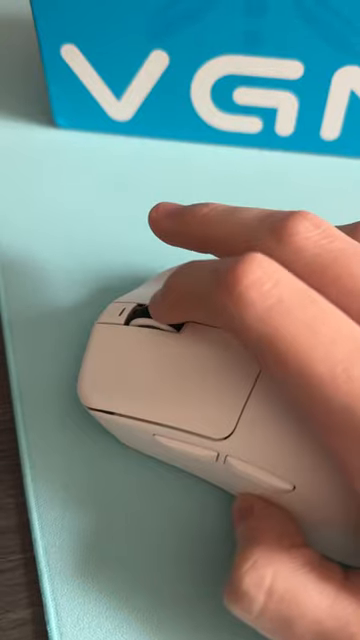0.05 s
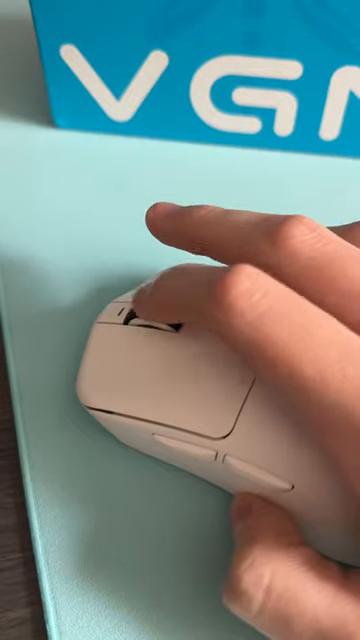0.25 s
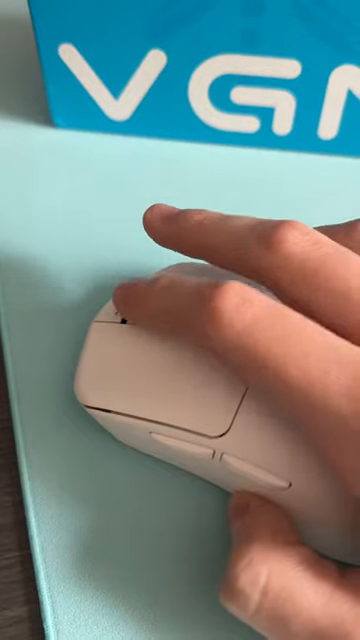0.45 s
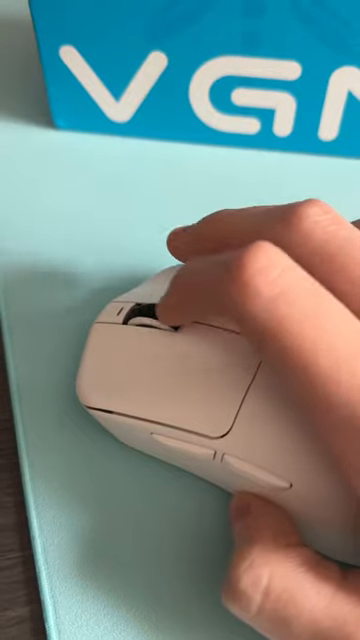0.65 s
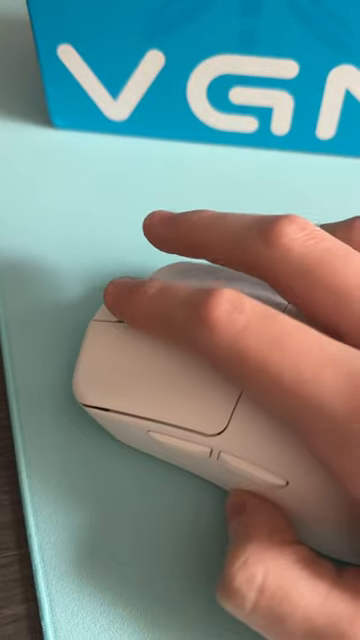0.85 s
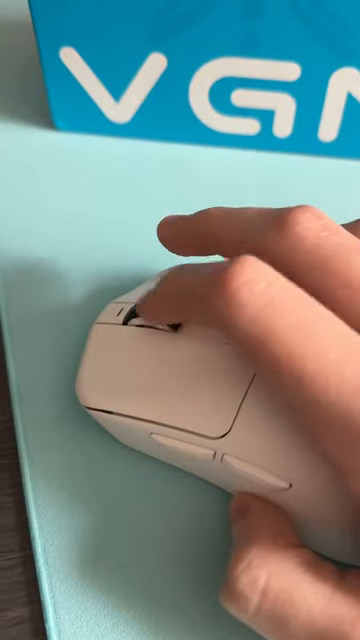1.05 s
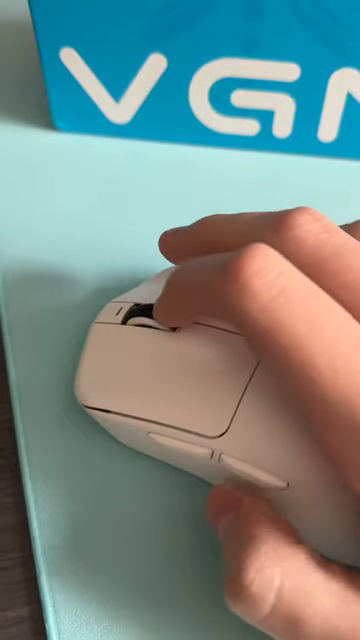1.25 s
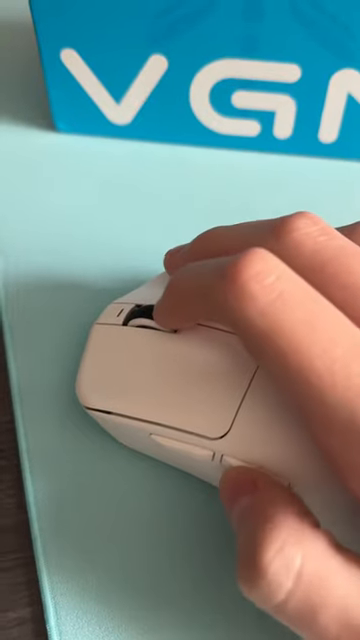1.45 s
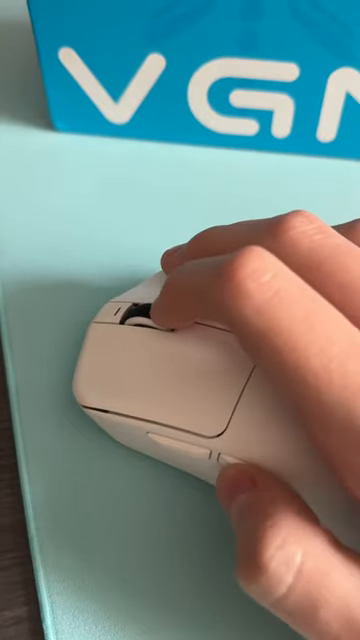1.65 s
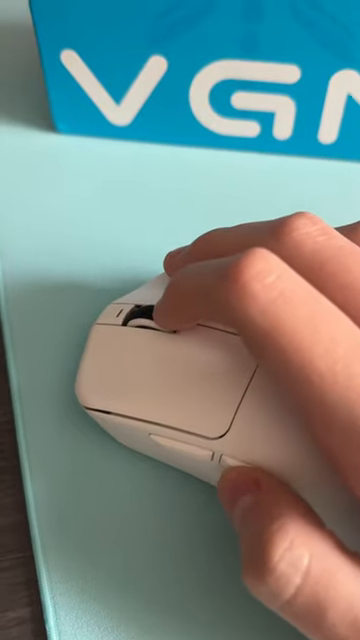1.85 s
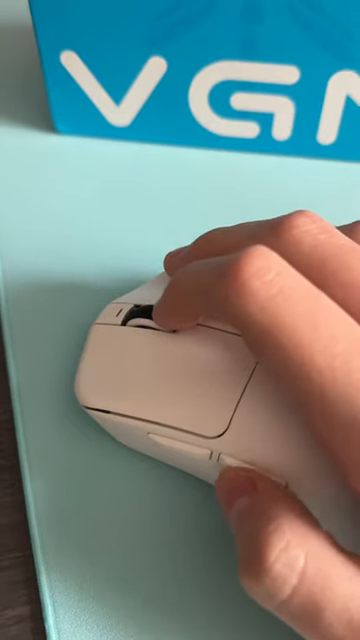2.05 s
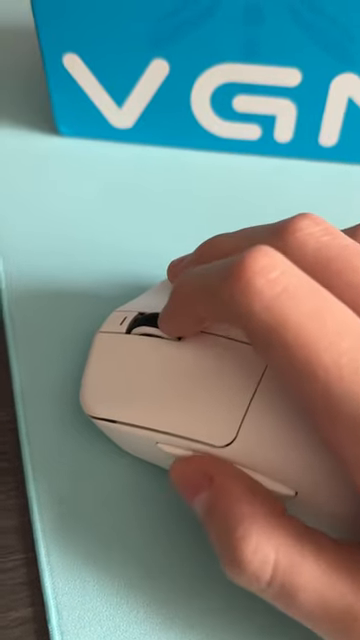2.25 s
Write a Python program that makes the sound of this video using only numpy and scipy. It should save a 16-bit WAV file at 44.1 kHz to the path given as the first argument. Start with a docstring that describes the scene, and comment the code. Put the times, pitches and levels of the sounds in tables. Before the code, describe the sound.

A plastic computer mouse wheel ratchets in four short flicks of hollow ticks. Then a thumb clicks a side button four times, each snapping down and up. The microphone is close, in a small quiet room.

```python
"""Scrolling and clicking a computer mouse

A finger rolls the wheel of a plastic mouse in four short flicks, then a thumb clicks a side button four
times. Each wheel notch is two quick contacts that ring the hollow shell. The button's switch snaps going
down and coming up. Two close microphone ports also hear a small quiet room and the moving hand's rumble."""
import sys
import numpy as np
from scipy import signal
from scipy.fft import rfft, irfft
from scipy.io import wavfile
from scipy.ndimage import uniform_filter1d

SR = 44100
rng = np.random.default_rng(int(sys.argv[2]) if len(sys.argv) > 2 else 0)


def master(y):
    """Save y as 16-bit WAV."""
    cut = np.clip(np.atleast_2d(y).T, -1, 1)
    pcm = np.round(cut * 32767)  # scale
    wavfile.write(sys.argv[1], SR, pcm.astype(np.int16))


N = 101429
T = np.arange(int(.04 * SR)) / SR  # the seconds within one click

# The tone of each noise. Each row: frequency in Hz, relative level in dB.
ROOM_SPECTRUM = [(25, -4), (112, 4.5), (700, -5), (2210, -12.5), (6610, -24.5), (14300, -51.5)]
RUMBLE_SPECTRUM = [(50, -2), (120, 1), (170, -12), (230, -0.5), (600, -21)]
PLASTIC_SPECTRUM = [(500, -19), (1620, 2.5), (2600, -0.5), (14100, -35.5), (13000, -40)]
SWITCH_SPECTRUM = [(250, -28), (700, -5.5), (4400, -3.5), (7500, -2.5), (9000, -5.5), (12000, -22),
                   (14500, -4.5), (17000, -41)]
WHEEL_SPECTRUM = [(600, -21), (1000, 11.5), (1900, -12), (3200, -0.5), (5000, -8.5), (8000, -11),
                  (12000, -42.5), (15000, -37)]
# How the hand's rumble rises and falls. Each row: time in seconds, level in dB.
RUMBLE_LEVELS = [(.1, -69), (.25, -57.5), (.43, -60), (0.599, -56.5), (0.719, -63), (1.4, -78.5)]
# How much the two ports differ. Each row: frequency in Hz, difference against the shared sound in dB.
PORT_DIFFERENCE = [(40, -23), (400, -4.5), (900, -34.5), (2400, -6), (7500, -2.5), (12000, 18), (16000, 3)]
# The tones each part rings with. Each row: pitch in Hz, width in Hz before damping (wider dies sooner),
# relative strength in dB.
TAP_TONES = [(745, 40, -2.5)]
CAP_TONES = [(1623, 110, -7.5), (2360, 223, 6.5), (2634, 150, -6.5)]
PRESS_TONES = [(958, 210, -14), (2402, 117, -8.5), (3325, 125, -9), (4385, 230, -6.5), (4855, 200, -7),
               (5910, 230, -6), (6964, 320, -1), (7500, 211, 1.5), (14360, 190, -11.5), (15500, 350, -14.5)]
RELEASE_TONES = [(920, 130, -17), (2200, 58, -12.5), (3310, 130, -8), (4380, 527, -8.5), (5980, 250, -5.5),
                 (6890, 260, 1), (7467, 340, 0.5), (13200, 660, -17)]
SHELL_TONES = [(785.5, 183, -7.5), (1074, 97, -12)]
WHEEL_TONES = [(902, 99.1, 7), (1629, 45, -11), (2213, 84, -11.5), (2694, 124, -12.5), (3298, 104, -14.5),
               (3790, 130, -10.5), (4100, 125, -13)]
KNOCK_TONES = list(WHEEL_TONES[:1]) + SHELL_TONES  # the low tones, heard as the shell's knock
# Fingertip rubs. Each row: middle in seconds, half length in seconds, relative level in dB.
FINGER_RUBS = [(0.2, 0.024, -74), (0.479, 0.046, -74.5), (0.712, 0.008, -70.5)]
# The button cap meets its stop. Each row: start in seconds, relative level in dB.
CAP_HITS = [(1.361, -50), (2.067, -31)]
# The button goes down and up. Each row: start in seconds, relative levels of snap and shell knock in dB.
BUTTON_DOWNS = [(1.4422, -26.5, -46), (1.6185, -25.5, -36), (1.7843, -24.5, -64), (1.9407, -26, -47)]
BUTTON_UPS = [(1.5502, -29, -39.5), (1.7185, -29.5, -49), (1.8690, -28.5, -48.5), (2.0335, -28, -48)]
# The wheel's notches. Each row: start in seconds, first contact's relative level in dB, gap in seconds,
# second contact's relative level and brightness in dB, knock pitch in Hz, bite in dB, snap in dB.
WHEEL_NOTCHES = [(0.237, -31.5, .0035, -26, 2, 842, 1.5, -2.5),
                 (0.2693, -23.5, .0040, -21.5, -10, 905, -5.5, 2.5),
                 (0.3016, -29, .0040, -21, -6.5, 910, 0, -3),
                 (0.3551, -36.5, .0035, -34.5, -5.5, 880, -5, -20),
                 (0.4872, -34.5, .0062, -28, 0, 880, -1, 3),
                 (0.5162, -42.5, .0052, -25.5, -1, 900, -0.5, -2),
                 (0.5419, -35.5, .0043, -20.5, -3.5, 923, 4.5, -0.5),
                 (0.561, -53.5, .0033, -21, -0.5, 936, 8.5, -2.5),
                 (0.5863, -46, .0022, -25.5, 0, 913, 3, -3.5),
                 (.7560, -24.5, .0030, -20.5, -4.5, 892, -4.5, -1),
                 (0.7702, -20.5, .0032, -20, -4.5, 905, -2.5, 4.5),
                 (0.787, -24.5, .0037, -16.5, -6.5, 895, -0.5, -2),
                 (0.8128, -25.5, .0040, -22, -6, 933, -2.5, -5),
                 (0.8512, -32, .0030, -27.5, 0.5, 845, -2, -11.5),
                 (0.992, -50.5, .0040, -55, 15.5, 780, -1, 4),
                 (1.0225, -62, .0053, -25.5, -1, 913, 1.5, 11),
                 (1.0379, -37, .0045, -23, -1.5, 904, 2.5, 0), (1.0538, -34.5, .0030, -22.5, 1, 926, 1, -1),
                 (1.0705, -29.5, .0043, -22.5, -2.5, 925, 3.5, -2),
                 (1.0867, -41, .0028, -23, -0.5, 930, 3, 2), (1.226, -41, .0020, -57, 16.5, 830, -7, 7)]

BITE_HZ, SNAP_HZ = 3370, 10400  # where a notch's bite and snap turn the treble up or down
GRIT_DB_PER_DB, HARD_HIT_DB = 0.17, -28  # contacts harder than this get extra grit
BRIGHT_ABOVE_HZ, FIRST_BRIGHT_DB = 1500, 3
ROOM_FADE_S, TREBLE_FADE_S = 0.75, 0.26  # time to fade by 60 dB


def undb(db):
    """Turn decibels into a number to multiply by."""
    return 10 ** (np.asarray(db) / 20)


def colour(x, points):
    """Shape a sound's tone along a curve of (Hz, dB) points."""
    hz, db = np.array(points, float).T
    f = np.maximum(np.fft.rfftfreq(x.shape[-1], 1 / SR), 1)
    return irfft(rfft(x) * undb(np.interp(np.log(f), np.log(hz), db)), x.shape[-1])


def cut(x, hz, order, kind="lowpass"):
    """Turn down what lies above hz, or below it for "highpass"."""
    return signal.sosfilt(signal.butter(order, hz, kind, fs=SR, output="sos"), x)


def noise(points, size):
    """Noise with the given tone and a typical size of 1."""
    x = colour(rng.standard_normal(size), points)
    return x / x.std()


def add(track, s, sound):
    """Mix a short sound in at s seconds."""
    i = int(s * SR)
    track[i:i + len(sound)] += sound[:N - i]


def ring(tones, attack_s, damping, bright_db=0, scatter=0.029):
    """Struck plastic rings up quickly and dies away, at slightly different pitches each time."""
    hz, width, db = np.array(tones, float).T[:, :, None]
    size = undb(db) * width
    size = size / size.max() * undb(bright_db * (hz > BRIGHT_ABOVE_HZ))
    hz = hz * (1 + scatter * rng.standard_normal(hz.shape))
    waves = size * np.sin(2 * np.pi * hz * T) * np.exp(-np.pi * width * damping * T)
    return waves.sum(0) * (1 - np.exp(-(T / attack_s) ** 2))


def crack(points, attack_s, decay_s):
    """The short burst of noise when two parts meet."""
    return noise(points, len(T)) * (1 - np.exp(-(T / attack_s) ** 2)) * np.exp(-T / decay_s)


def ports(x):
    """The right microphone port hears the mouse first; the two differ most in the treble."""
    side = colour(signal.hilbert(x).imag, PORT_DIFFERENCE)
    return np.array([x + side, x - side])


def background():
    """Steady dull room noise, and a rumble that comes and goes as the hand moves."""
    s, db = np.array(RUMBLE_LEVELS).T
    rumble = noise(RUMBLE_SPECTRUM, N) * undb(np.interp(np.arange(N) / SR, s, db))
    rumble = cut(rumble, hz=700, order=2)
    side = colour(noise(ROOM_SPECTRUM, N), [(40, -36), (350, -3.0)])
    hush = undb(-71) * (noise(ROOM_SPECTRUM, N) + np.array([side, -side]))
    return cut(ports(rumble) + hush, hz=9700, order=4)


def rustle(fade_s=0.022):
    """A soft rustle dies away at the start."""
    return ports(noise(WHEEL_SPECTRUM, N) * undb(-66) * np.exp(-np.arange(N) / SR / fade_s))


def room(x, tail_db, wall_db, build_s=0.0012, wall_s=.0195):
    """The room answers with a short wash of echoes that dulls as it fades, and one clear wall echo."""
    t = np.arange(SR // 2) / SR
    mid, side = rng.standard_normal((2, len(t)))
    side = colour(side, [(200, 19.0), (900, -6), (3000, -1.0)])
    both = np.array([mid + side, mid - side])
    low = colour(both, [(2000, -21), (6000, -38.0)])
    tail = low * undb(-60 * t / ROOM_FADE_S) + (both - low) * undb(-60 * t / TREBLE_FADE_S)
    tail *= 1 - np.exp(-(t / build_s) ** 2)
    tail *= undb(tail_db) / np.sqrt((tail ** 2).sum() / 2)
    tail[:, int(wall_s * SR)] += undb(wall_db)
    echoes = signal.fftconvolve(x[None], tail, axes=1)[:, :N]
    return colour(echoes, [(8000, -0.5), (15000, -9.5)])


def desk(x, delay_s=.008):
    """The nearby desk throws back one early echo."""
    return x + undb(-19.5) * np.pad(x, (int(delay_s * SR), 0))[:N]


def rubbing(rough_db, grain_s):
    """Skin drags unevenly over the plastic in short soft swells."""
    t = np.arange(N) / SR
    swell = sum(undb(db) * np.exp(-((t - s) / half_s) ** 2) for s, half_s, db in FINGER_RUBS)
    grip = uniform_filter1d(rng.standard_normal(N), int(grain_s * SR))
    return noise(PLASTIC_SPECTRUM, N) * swell * undb(rough_db * grip / grip.std())


def finger_tap(start_s):
    """The fingertip lands dully on the shell."""
    out = np.zeros(N)
    body = ring(TAP_TONES, attack_s=0.0014, damping=0.71)
    grit = crack(PLASTIC_SPECTRUM, attack_s=0.0007, decay_s=0.0042)
    add(out, start_s, undb(-47) * (body + undb(-12) * grit))
    return out


def cap_knocks():
    """The loose button cap knocks against its stop as the thumb lands and lifts."""
    out = np.zeros(N)
    for s, db in CAP_HITS:
        body = ring(CAP_TONES, attack_s=0.0014, damping=0.52)
        grit = crack(PLASTIC_SPECTRUM, attack_s=0.0013, decay_s=0.0032)
        add(out, s, undb(db) * (body + undb(-7) * grit))
    return out


def cap_rattle(ticks_per_s=700, fade_s=0.0077):
    """The loose cap chatters after a snap: many tiny ticks that die away."""
    ticks = rng.standard_normal(len(T)) * (rng.random(len(T)) < ticks_per_s / SR)
    chatter = cut(colour(ticks, SWITCH_SPECTRUM), hz=7500, order=4)
    return chatter / chatter.std() * np.exp(-T / fade_s)


def switch(events, tones, gain_db, attack_s, damping, bounce_s, bounce_db, decay_s=0.0012):
    """The switch's metal leaf snaps over and bounces once, ringing the cap and knocking the shell."""
    out = np.zeros(N)
    for s, db, shell_db in events:
        snap = ring(tones, attack_s, damping, scatter=0.012)
        snap += undb(-7.5) * crack(SWITCH_SPECTRUM, attack_s, decay_s)
        knock = ring(KNOCK_TONES, attack_s, damping=2.83)
        add(out, s, undb(db + gain_db) * (snap + undb(-28.5) * cap_rattle()) + undb(shell_db) * knock)
        add(out, s + bounce_s, undb(db + bounce_db) * crack(SWITCH_SPECTRUM, attack_s, decay_s))
    return out


def wheel():
    """A spring scrapes up a tooth, slips over and drops into the next notch, ringing the shell twice."""
    out = np.zeros(N)
    for s, first_db, gap_s, second_db, bright_db, knock_hz, bite_db, snap_db in WHEEL_NOTCHES:
        # Each notch knocks at a slightly different pitch.
        tones = [(hz * knock_hz / KNOCK_TONES[0][0], width, db) for hz, width, db in KNOCK_TONES]
        tones += list(WHEEL_TONES[1:])
        treble = [(BITE_HZ / 2, 0), (BITE_HZ, bite_db), (SNAP_HZ / 2, 0), (SNAP_HZ, snap_db)]
        for at, db, bright in ((s, first_db, FIRST_BRIGHT_DB), (s + gap_s, second_db, bright_db)):
            body = ring(tones, attack_s=0.0015, damping=1.324, bright_db=bright, scatter=0.018)
            grit = crack(WHEEL_SPECTRUM, attack_s=0.00062, decay_s=0.0021)
            grit_db = bright - 10.5 + GRIT_DB_PER_DB * max(db - HARD_HIT_DB, 0)
            contact = undb(4.5) * body + undb(grit_db) * grit
            add(out, at, undb(db) * colour(contact, treble))
        # A backwards crack makes a scrape that swells up to the second contact.
        scrape = crack(WHEEL_SPECTRUM, attack_s=0.00069, decay_s=0.0047)[::-1]
        scrape_db = max(first_db, second_db) - 21.5 + bright_db / 2
        add(out, s + gap_s - T[-1], undb(scrape_db) * scrape)
    return out


def scene():
    """The wheel, then the side button, in the quiet room."""
    scroll = wheel() + finger_tap(start_s=1.261) + rubbing(rough_db=0.5, grain_s=0.0044)
    scroll = desk(cut(scroll, hz=610, order=6, kind="highpass"))  # the small shell gives off little bass
    press = switch(BUTTON_DOWNS, PRESS_TONES, gain_db=3, attack_s=0.001, damping=0.87,
                   bounce_s=0.0043, bounce_db=-14.5)
    release = switch(BUTTON_UPS, RELEASE_TONES, gain_db=2.5, attack_s=0.00053, damping=0.68,
                     bounce_s=0.0049, bounce_db=-15.5)
    button = press + release + cap_knocks()
    echoes = room(scroll, tail_db=-11, wall_db=-23) + room(button, tail_db=-10, wall_db=-31)
    return ports(scroll + button) + echoes + rustle() + background()


def record(dry):
    """The highest treble, above 16600 Hz, is cut away."""
    return signal.sosfilt(signal.ellip(8, .2, 70, 16600, fs=SR, output="sos"), dry)


dry = scene()
out = record(dry)
master(out)
```